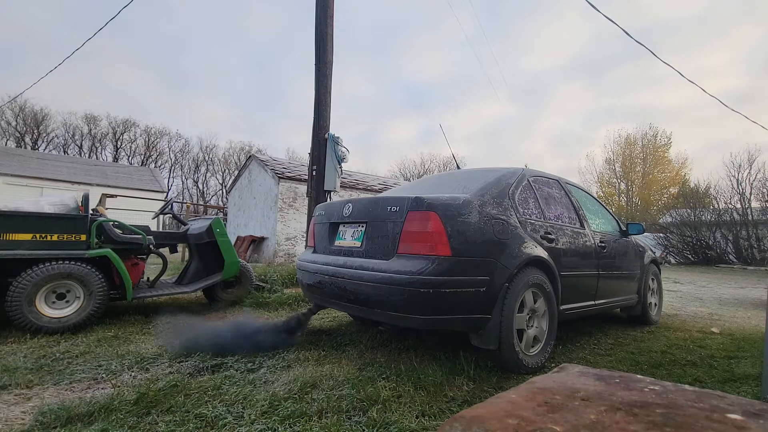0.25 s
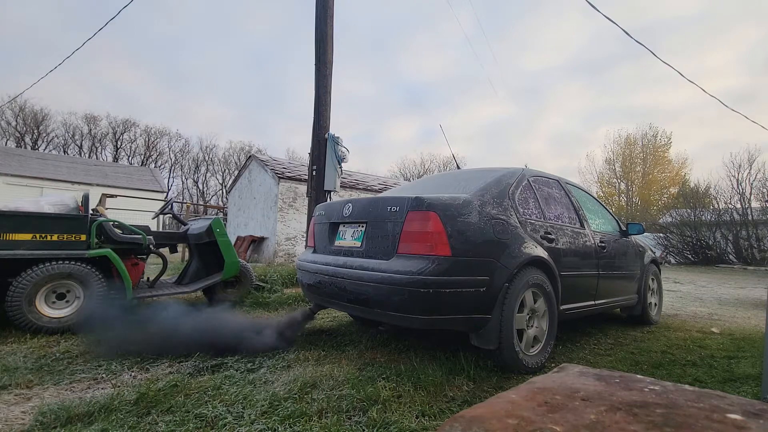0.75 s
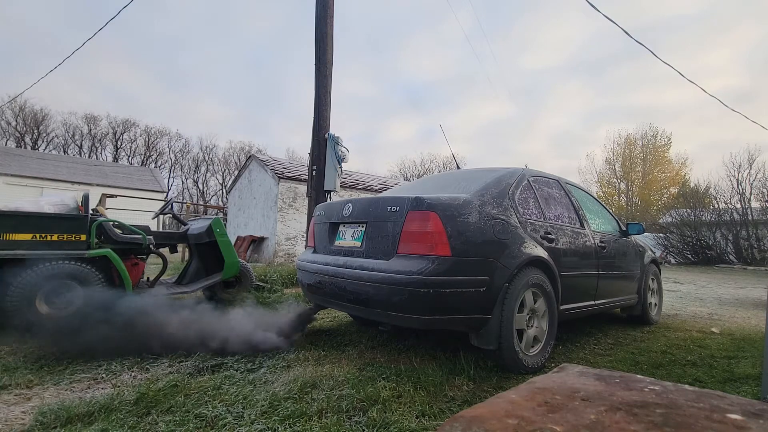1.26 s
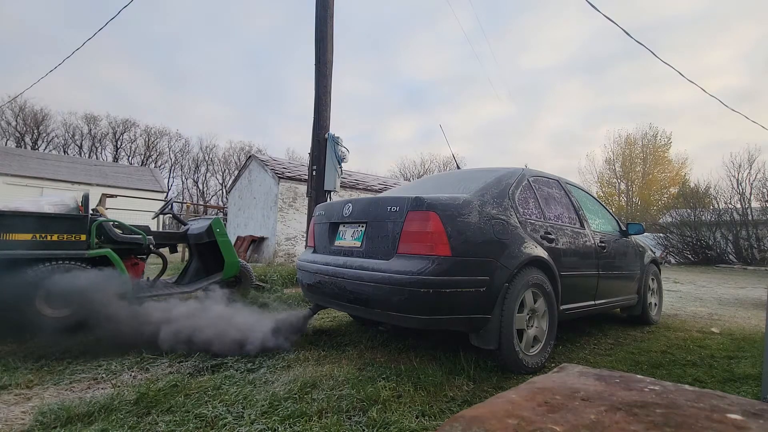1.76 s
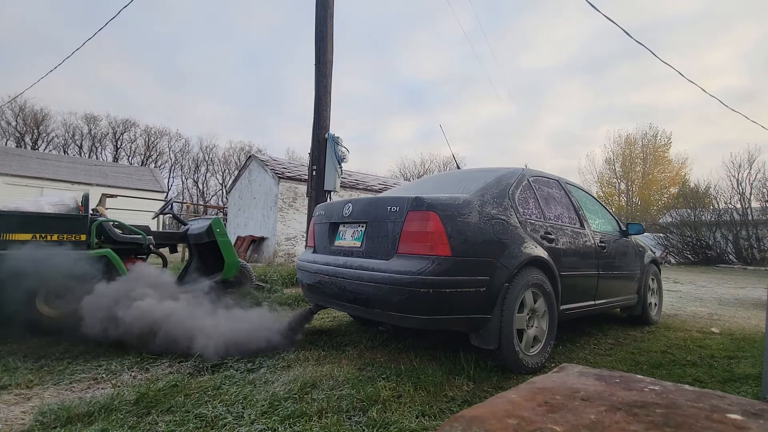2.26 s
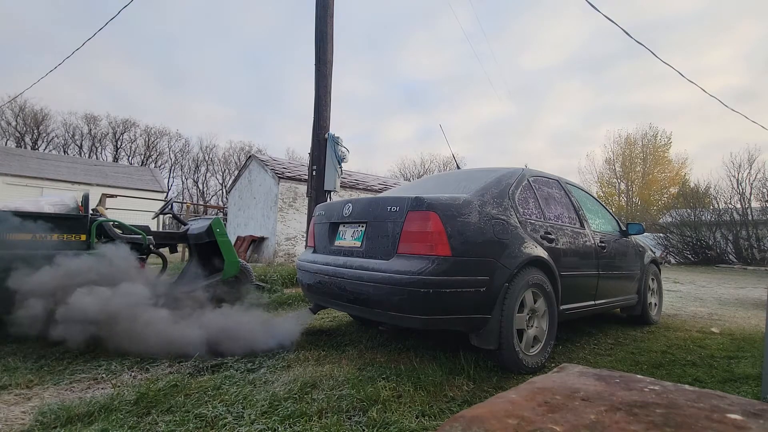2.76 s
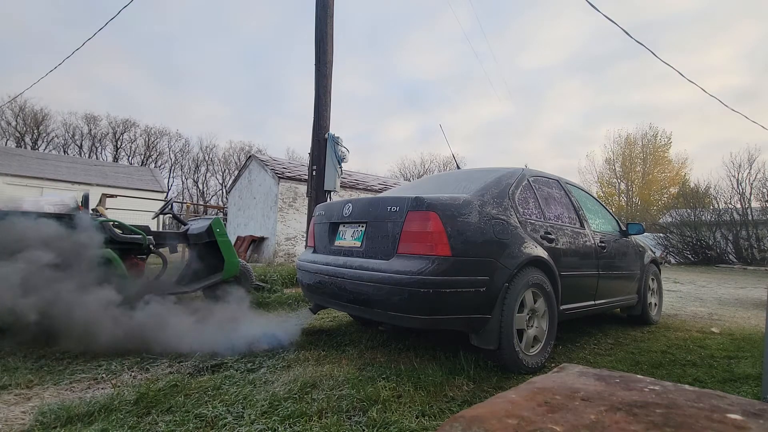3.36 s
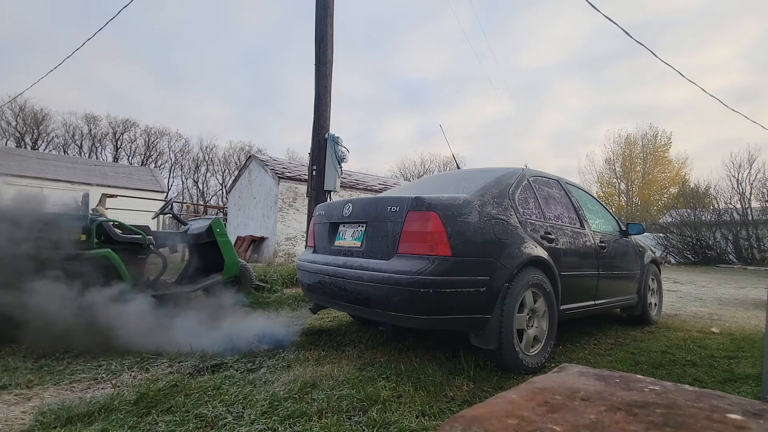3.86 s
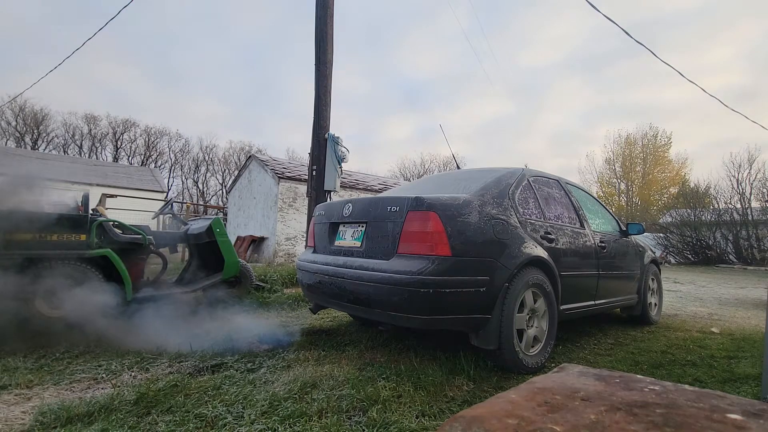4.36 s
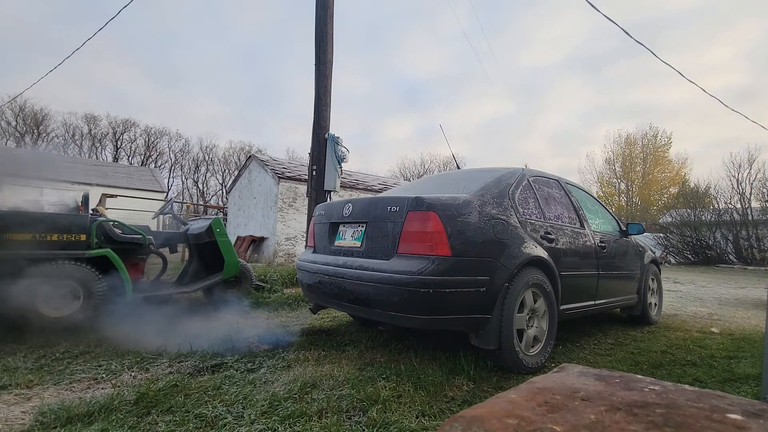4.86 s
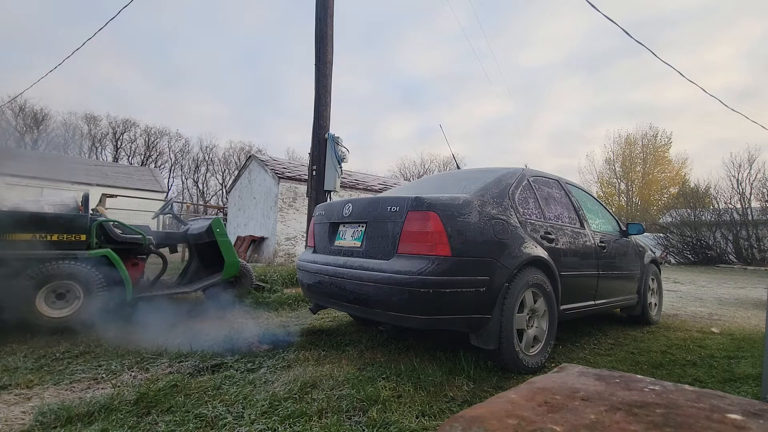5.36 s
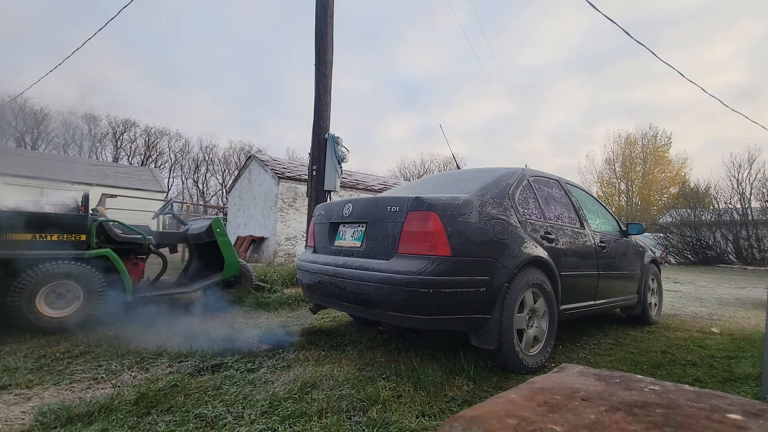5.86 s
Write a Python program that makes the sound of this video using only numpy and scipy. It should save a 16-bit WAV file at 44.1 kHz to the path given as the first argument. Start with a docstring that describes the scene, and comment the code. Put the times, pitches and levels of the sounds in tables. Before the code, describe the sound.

Heard outdoors from close behind the car, a cold diesel engine starts after a brief starter rasp. Ragged clusters of hard knocks, gear rattle and hollow tailpipe honks lurch along with gaps between. The bursts crowd together, a faint whistle rises with a short flare of speed, then everything drops to a lumpy idle with low exhaust boom, metallic knocking and soft belt whirr.

```python
"""A cold four-cylinder diesel car stumbles in ragged bursts of firings, flares up and settles to idle outdoors.
A short starter rasp opens it. Heard from behind, each firing knocks the block and puffs into the exhaust,
noise and clicks that ring resonances. A deep pipe resonance booms, at idle at twice the firing rate.
The tailpipe honks, made of wavering tones, and gears clatter in noise bursts while the crank jerks.
A whistle, a narrow band of noise, rises and falls with the flare; belts and pump whirr softly beneath."""
import sys
import numpy as np
from scipy import signal
from scipy.fft import rfft, irfft, next_fast_len
from scipy.io import wavfile
from scipy.ndimage import uniform_filter1d

SR = 44100
rng = np.random.default_rng(int(sys.argv[2]) if len(sys.argv) > 2 else 0)


def dump_mix(stems):
    """Bounce the given channels to the path in sys.argv[1] as a 16-bit WAV at rate SR."""
    frames = np.atleast_2d(stems).T  # one column per channel
    limited = np.clip(frames, -1, 1)  # hard clip at full scale
    pcm = np.round(limited * 32767).astype(np.int16)
    wavfile.write(sys.argv[1], SR, pcm)


N = 269892
T = np.arange(N) / SR

# In every table, balance_db is left minus right and lead_rad is how far the left side leads.
# speed of the running engine: time_s, firings_per_s
RUNNING_SPEED = [(1.932, 47.66), (2.135, 41.01), (2.25, 37.17), (2.36, 34.61), (2.55, 33.78), (2.7, 37.12),
                 (2.8, 32.97), (2.92, 34.41), (3.3, 34.03), (4.1, 33.82), (4.8, 33.88), (4.95, 32.86),
                 (5.15, 33.97), (5.7, 33.74), (5.9, 32.94), (6.12, 36.69)]
# how hard the running engine works: time_s, knock_db, puff_db (before each firing's own differences)
ENGINE_LOAD = [(2.13, -28.5, -27), (2.4, -30, -32), (2.65, -26, -24), (3.0, -27.5, -27), (3.7, -30, -32),
               (5.0, -30, -31), (6.12, -32, -33.5)]
# hardening of the exhaust pulses as the engine pulls itself up to speed: time_s, extra_db
PULSE_HARDNESS = [(1.1, -3.5), (1.9, -3.5), (2.25, 7), (2.6, 0), (3.4, -0.5)]
# the ragged firings of the start: time_s, knock_db, rattle_db, honk_db
STUMBLING_FIRINGS = [(0.004, -25, -35, -18), (0.035, -27, -35.5, -31), (0.081, -19, -43, -25),
                     (0.204, -29, -36.5, -19), (0.231, -34, -26, -8.5), (0.26, -22.5, -65, -29),
                     (0.287, -28, -31.5, -13.5), (0.311, -25, -55, -44), (0.407, -29.5, -56, -34),
                     (0.444, -32, -32.5, -20.5), (0.478, -25, -28, -10), (0.541, -25.5, -33.5, -14.5),
                     (0.566, -22, -53, -41), (0.641, -35.5, -35.5, -24.5), (0.675, -24.5, -33.5, -13.5),
                     (0.707, -21, -31.5, -14.5), (0.734, -19.5, -30.5, -10.5), (0.759, -19.5, -47, -28),
                     (0.892, -42.5, -36, -25), (0.931, -28, -32, -12.5), (0.964, -22.5, -30, -19),
                     (0.993, -19.5, -31.5, -10.5), (1.021, -23.5, -50.5, -30), (1.204, -29.5, -33.5, -24),
                     (1.239, -23, -29.5, -25), (1.268, -18.5, -42, -14), (1.293, -20.5, -38, -35),
                     (1.318, -16, -38.5, -45), (1.412, -35.5, -30.5, -25), (1.447, -27.5, -30, -29),
                     (1.474, -21.5, -33, -18), (1.501, -16, -41, -17), (1.527, -21, -48.5, -28),
                     (1.617, -34, -37.5, -21), (1.645, -27.5, -28.5, -30), (1.672, -20, -33.5, -26),
                     (1.696, -17, -48, -31), (1.721, -22, -38, -28), (1.767, -16, -38, -40),
                     (1.817, -38, -32, -16), (1.847, -25.5, -44.5, -38), (1.87, -18.5, -41, -28),
                     (1.89, -21.5, -34, -25.5), (1.913, -17.5, -50, -31), (1.954, -22, -37.5, -40),
                     (1.975, -22, -37.5, -36.5), (2.019, -20.5, -52, -41), (2.041, -21.5, -40.5, -47),
                     (2.087, -19.5, -40, -48)]
# the crank kicks back against compression between surges: time_s, rattle_db, boom_db
CRANK_KICKBACKS = [(0.143, -31.5, -11.5), (0.376, -32.5, -12), (1.163, -33.5, -15)]
# cylinders in firing order: extra_knock_db, extra_puff_db, ring_hz, relative_ring_db, balance_db
CYLINDER_TRAITS = [(3.3, -1, 1000, 14, -9.5), (4.5, -0.5, 3100, 9.5, -1), (1.5, 2, 1700, 12, -7.5),
                   (3, -1.5, 2550, 7.5, -11.5)]

RUNS_FROM_S = 2.105  # the regular firings are heard from here on


def from_db(db):
    """Turn decibels into gain."""
    return 10 ** (np.asarray(db) / 20)


def at_time(rows, s):
    """Read each column of a curve at the times s."""
    times, *columns = np.transpose(rows)
    return [np.interp(s, times, column) for column in columns]


def at_hz(points, hz):
    """Read a spectrum on a log-frequency axis."""
    knots, values = np.transpose(points)
    return np.interp(np.log(hz + 1), np.log(knots), values)


def pan(db):
    """Left and right gains for a level difference."""
    return from_db(db * np.array([[.5], [-.5]]))


def filtered(x, hz, kind="low"):
    """Second-order filter that keeps what lies below, above or between the given pitches."""
    return signal.sosfilt(signal.butter(2, hz, kind, fs=SR, output="sos"), x)


def resonate(x, hz, width_hz):
    """A ringing resonance that keeps the power of white noise; a narrower one rings longer."""
    r = np.exp(-np.pi * width_hz / SR)
    feedback = [1, -2 * r * np.cos(2 * np.pi * hz / SR), r * r]
    return signal.lfilter([1, 0, -1], feedback, x + 1e-18) * np.sqrt((1 - r * r) / 2)


def mode(drive, hz, width_hz, db, balance_db, lead_rad):
    """One resonance, reaching left and right with different levels and phase."""
    wave = resonate(drive, hz, width_hz)
    wave = filtered(wave, min(1.34 * hz, 5600))
    late = np.interp(T - lead_rad / (2 * np.pi * hz), T, wave)
    return from_db(db) * pan(balance_db) * np.array([wave, late])


def pair(mid, side, hz):
    """Mix two unrelated signals into left and right, as alike as the air makes them at each pitch."""
    # pitch_hz, likeness (1 the same, -1 opposite)
    stereo_likeness = [(100, 1), (270, 1), (450, 0.81), (1220, -0.82), (2000, -0.23), (3300, -0.66),
                       (5500, 0.77), (10000, 0.52)]
    alike = np.clip(at_hz(stereo_likeness, hz), -.98, .98)
    mid = mid * np.sqrt((1 + alike) / 2)
    side = side * np.sqrt((1 - alike) / 2)
    return np.array([mid + side, mid - side])


def hiss(envelope, colour):
    """Stereo noise shaped in time by an envelope, then in pitch by a filter that never sounds early."""
    # loudness of left against right: pitch_hz, balance_db
    noise_balance = [(60, 6.5), (160, 8.5), (450, -11.5), (1220, -7), (2500, -1.5), (3300, -1.5),
                     (5000, 12), (8000, 11.5), (13000, 0.5)]
    size = 2 * next_fast_len(N // 2 + 4096)
    hz = np.fft.rfftfreq(size, 1 / SR)
    gain = from_db(at_hz(colour, hz))
    # folding the cepstrum (spectrum of the log gain) gives the filter its earliest response
    cepstrum = irfft(np.log(gain / np.sqrt(np.mean(gain ** 2))))
    cepstrum[1:size // 2] *= 2
    cepstrum[size // 2 + 1:] = 0
    noise = rng.standard_normal((2, N)) * envelope
    mid, side = rfft(noise, size) * np.exp(rfft(cepstrum))
    return irfft(pair(mid, side, hz) * pan(at_hz(noise_balance, hz)))[:, :N]


def clicks(times, sizes):
    """One sample of the given size at each time."""
    return np.bincount(np.clip(times * SR, 0, N - 1).astype(int), sizes, N)


def die_away(x, s):
    """Let each input fade exponentially over s seconds."""
    return signal.lfilter([1], [1, -np.exp(-1 / (s * SR))], x + 1e-18)


def bursts(times, level_db, hold_s, decay_s, tail_db, tail_s):
    """Envelope of blows: a short swell, a fast decay, then the weak scatter from yard and sheds."""
    energy = clicks(times, from_db(level_db) ** 2)
    power = die_away(energy, decay_s) + from_db(tail_db) ** 2 * die_away(energy, tail_s)
    return np.sqrt(die_away(power, hold_s) / (hold_s * SR))


def swells(times, level_db, half_s):
    """Summed power of bell-shaped swells."""
    return sum(from_db(db) ** 2 / (1 + ((T - s) / half_s) ** 2 / 2) ** 4
               for s, db in zip(times, level_db))


def grit(rough_db=2.5, size=24):
    """Half-millisecond grains of uneven strength, as of many tiny contacts; mean power 1."""
    grains_db = rough_db * rng.standard_normal(N // size + 1).clip(-2, 2)
    gain = np.repeat(from_db(grains_db), size)[:N]
    return gain / np.sqrt(np.mean(gain ** 2))


def breathy(hz, width_hz):
    """A narrow band of noise that follows a pitch."""
    waver = filtered(rng.standard_normal((2, N)), width_hz)
    slow_noise = (waver[0] + 1j * waver[1]) / waver.std()
    carrier = np.exp(2j * np.pi * np.cumsum(hz) / SR)
    return (slow_noise * carrier).real


def running_firings(scatter_db=2.2, jitter_s=0.0002, puff_share=0.35, lump_db=1.36):
    """Time firings by crank speed, set strength by load and cylinder: times, knock dB, puff dB, cylinder."""
    # a cylinder lights all at once with a bang, or barely lights: time_s, extra_knock_db
    odd_firings = [(2.435, -6.5), (2.462, 7.5), (2.492, 9), (2.52, 5), (2.55, -22), (2.611, 7.5),
                   (2.693, 4), (2.78, -26), (2.806, -2.5), (2.896, 5.5), (3.041, 4.5), (3.1, 5.5),
                   (3.16, 1.5), (2.984, 3), (3.25, -20.5), (3.335, 4.5), (3.453, 6.5), (3.48, -16.5),
                   (3.51, 7), (3.54, 4.5), (3.804, 6.5), (4.072, -6), (4.31, -14), (4.336, 8), (4.427, 7.5),
                   (4.543, 5), (4.633, 5.5), (4.9, -7.5), (4.991, 9.5), (5.138, 6.5), (5.97, 7.5)]
    speed = at_time(RUNNING_SPEED, T)[0] * (T > RUNNING_SPEED[0][0])
    count = np.cumsum(speed) / SR
    times = np.interp(np.arange(int(count[-1]) + 1), count, T)
    cylinder = np.arange(len(times)) % len(CYLINDER_TRAITS)
    late, harder, fuller = rng.standard_normal((len(times), 3)).T
    own_db, own_puff_db = np.array(CYLINDER_TRAITS)[cylinder, :2].T
    extra_db = own_db + scatter_db * harder
    for s, db in odd_firings:
        extra_db[np.argmin(abs(times - s))] = db
    knock_db, puff_db = at_time(ENGINE_LOAD, times)
    # a harder knock also puffs harder
    puff_db = puff_db + own_puff_db + puff_share * extra_db + lump_db * fuller
    rows = np.array([times + jitter_s * late, knock_db + extra_db, puff_db, cylinder])
    return rows[:, times > RUNS_FROM_S]


def firings(running):
    """Join stumbling and running firings: times, knock dB and puff dB."""
    times, knock_db = np.transpose(STUMBLING_FIRINGS)[:2]
    # a firing with a -19 dB knock puffs at -19 dB; the puff follows 0.46 of the knock's swing
    puff_db = -19 + 0.46 * (knock_db + 19.0)
    return np.hstack([[times, knock_db, puff_db], running[:3]])


def honks(delay_s=0.0064, kick_honk_db=-22.5):
    """The heavily fuelled firings honk after a delay, kickbacks at one fixed level: times and dB."""
    times, _, _, level_db = np.transpose(STUMBLING_FIRINGS)
    kick_s = np.array(CRANK_KICKBACKS)[:, 0]
    return np.r_[times, kick_s] + delay_s, np.r_[level_db, np.full(len(kick_s), kick_honk_db)]


def jerks():
    """The crank jerks at each stumbling firing and at kickbacks: times and dB."""
    return np.vstack([np.array(STUMBLING_FIRINGS)[:, ::2], np.array(CRANK_KICKBACKS)[:, :2]]).T


def puffs(times, puff_db, kick_lag_s=.022, kick_puff_db=-25.5):
    """Add the unburnt air that kickbacks push out of the tailpipe to the firings' puffs: times and dB."""
    kick_s = np.array(CRANK_KICKBACKS)[:, 0] + kick_lag_s
    return np.r_[times, kick_s], np.r_[puff_db, np.full(len(kick_s), kick_puff_db)]


def whirr():
    """Belts and pump whirr as steady noise that grows a little as the engine starts."""
    # pitch_hz, relative_level_db
    whirr_colour = [(25, 2.5), (60, -16), (130, 9.5), (450, 0), (750, -7.5), (2600, -12.5), (3300, -12.5),
                    (4900, -23.5), (6500, -39.5), (8000, -50), (10000, -64), (15000, -50.5)]
    level_db = np.interp(T, [1.5, 2.0], [-40.5, -36.5])
    return hiss(from_db(level_db), whirr_colour)


def hoots(waver_hz=22):
    """Faint, breathy hoots swell out of the idle as narrow bands of noise."""
    # time_s, half_length_s, pitch_hz, level_db
    hoot_rows = [(4.196, 0.045, 825, -42), (5.992, 0.057, 679, -40.5)]
    return pan(-10.0) * sum(np.sqrt(swells([s], [db], half_s)) * breathy(np.full(N, hz), waver_hz)
                            for s, half_s, hz, db in hoot_rows)


def ping(time_s=1.413, balance_db=10.0, lead_rad=1.0):
    """One jolt sets a small steel part ringing."""
    # pitch_hz, width_hz, relative_level_db
    steel_part = (6465, 50, -17)
    return mode(clicks(np.array([time_s]), [1.]), *steel_part, balance_db, lead_rad)


def whistle(times, knock_db, width_hz=80, whistle_db=-4.5, follow=0.69, chop_s=0.0049):
    """A breathy air whistle that glides with the flare and is chopped by the firings."""
    # time_s, pitch_hz, relative_level_db
    whistle_curve = [(1.8, 720, -24.5), (1.875, 850, -16), (1.955, 1010, -14), (2.03, 1130, -16.5),
                     (2.09, 1204, -19), (2.17, 1026, -20), (2.27, 816, -20.5), (2.34, 790, -51)]
    hz, level_db = at_time(whistle_curve, T)
    throb = bursts(times, follow * (knock_db + 19.5), 0.00063, chop_s, -20.5, 0.044)
    return pan(-8.5) * from_db(level_db + whistle_db) * throb * breathy(hz, width_hz)


def gears(clatter_db=4.0, rasp_db=-22.5, release_s=0.083):
    """The starter rasps until it lets go; the jerking crank then rattles the gears, tooth against tooth."""
    # starter noise: pitch_hz, relative_level_db
    rasp_colour = [(400, 6.5), (1500, -6), (2600, 1), (3800, -11), (5200, -12.5), (6200, -18), (8000, -28),
                   (10000, -37.5), (12700, -31.5), (15500, -31)]
    # gear noise: pitch_hz, relative_level_db
    clatter_colour = [(300, -14), (800, 7.5), (2200, -1), (3200, 4), (4000, -9), (5000, -19), (6500, -27),
                      (8000, -30.5), (10000, -50), (12700, -34), (15500, -39.5)]
    rasp = from_db(rasp_db) * np.exp(-np.maximum(T - release_s, 0) / 0.023)
    rattle = bursts(*jerks(), 0.002, 0.017, -14.5, 0.012)
    teeth = grit(rough_db=3.6)
    return hiss(rasp * teeth, rasp_colour) + from_db(clatter_db) * hiss(rattle * teeth, clatter_colour)


def cylinder_rings(running, width_hz=55, lead_rad=2.7, scatter_db=4.0):
    """Each cylinder strikes its own part of the block, which rings with a note of its own."""
    times, knock_db, _, cylinder = running
    knock_db = knock_db + scatter_db * rng.standard_normal(len(times))
    out = 0
    for k, (_, _, hz, db, balance_db) in enumerate(CYLINDER_TRAITS):
        strikes = clicks(times, from_db(knock_db) * (cylinder == k))
        out = out + mode(strikes, hz, width_hz, db, balance_db, lead_rad)
    return out


def knock(times, level_db, broad_db=-9.0, modes_db=-4.5, rumble_db=-39.5, second_crack_s=.0045, second_crack_db=-2.0):
    """Combustion cracks against the block in two quick blows, the second just after the first, and rings it in
    a varying mix."""
    # noise of the crack: pitch_hz, relative_level_db
    crack_colour = [(250, -7.5), (500, -16), (800, 4.5), (1800, 2.5), (2650, 5), (3200, -16), (4900, -20.5),
                    (6000, -27), (8000, -39), (10000, -64), (12700, -50), (15500, -71.5)]
    # resonances of the block: pitch_hz, width_hz, relative_level_db, balance_db, lead_rad
    block_modes = [(564.4, 26, -1.5, 0, 2), (850.5, 27, -4, -1, 1.83), (1027.5, 34, -10, -8.5, 2.5),
                   (1130, 390, -10.5, -6, 1.5), (1401, 62, -2, -3.5, 3.5), (1730, 40, -6.5, 0.5, 1.65),
                   (2103, 99, -7.5, -3, 3.5), (2427, 53, -14, -18, -4.5), (2608, 40, -8, 0, 4),
                   (4044, 240, -20.5, 10.5, -1.65), (4600, 220, -20, 6.5, -1.5)]
    times = np.r_[times, times + second_crack_s * rng.uniform(.5, 1.5, len(times))]
    level_db = np.r_[level_db, level_db + second_crack_db]
    crack = bursts(times, level_db, .0008, .004, -19, .022)
    out = from_db(broad_db) * hiss(crack * grit(), crack_colour)
    # valve gear and pump keep the block faintly ringing between knocks
    rumble = from_db(rumble_db) * np.clip(T / RUNS_FROM_S, 0, 1) ** 2
    for row in block_modes:
        mix_db = rng.normal(0, 2.0, len(times))
        strength = bursts(times, level_db + mix_db, .0007, .0029, -20, .022)
        drive = rng.standard_normal(N) * np.hypot(strength, rumble)
        out += from_db(modes_db) * mode(drive, *row)
    return out


def drone(lead_s=.002):
    """Once the engine runs, the even train of exhaust pulses sounds its low harmonics as sine tones."""
    # multiple_of_firing_rate, relative_level_db, balance_db
    harmonics = [(4, -8.5, -2), (8, -17.5, 2)]
    rate = at_time(RUNNING_SPEED, T)[0]
    firing_count = np.cumsum(rate * (T > RUNNING_SPEED[0][0])) / SR + lead_s * rate
    level_db = at_time(ENGINE_LOAD, T)[1] + .5 * at_time(PULSE_HARDNESS, T)[0]
    running = np.clip((T - 2.02) / .1, 0, 1)
    lines = sum(from_db(db) * pan(balance_db) * np.sin(2 * np.pi * round(order) * firing_count)
                for order, db, balance_db in harmonics)
    return running * from_db(level_db) * lines


def bark(bark_db=-1.5, waver_hz=40, slide_share=.04, slide_s=.012):
    """Honks swell and die on tailpipe resonances, wavering and sliding up in pitch as hot gas fills the pipe."""
    # tailpipe tones: pitch_hz, width_hz, relative_level_db, balance_db, lead_rad
    tailpipe_tones = [(276, 10, -17, 4, 0.5), (354, 10, -13, -9.5, 1.5), (556, 12, -1, -10, -2.5),
                      (612, 12, -5, -16, 0.98), (707, 44, -11, 1, -3.5)]
    times, level_db = honks()
    gush = bursts(times, level_db, .007, .009, -30, .04)
    age_s = T - np.maximum.accumulate(T * (clicks(times, from_db(level_db)) > 0))
    # from about 3 % below pitch, through it after slide_s, towards 4 % above
    slide = 1 + slide_share * np.tanh(age_s / slide_s - 1)
    out = 0
    for hz, width_hz, db, balance_db, lead_rad in tailpipe_tones:
        waver = filtered(rng.standard_normal(N), waver_hz)
        pitch_hz = hz * slide + width_hz * waver / waver.std()
        phase = 2 * np.pi * np.cumsum(pitch_hz) / SR
        out = out + from_db(db) * pan(balance_db) * np.sin([phase, phase - lead_rad])
    return from_db(bark_db) * gush * out


def boom_level(peak_share=0.63, swell_s=0.038, second_swell_s=0.034, kick_lag_s=0.051, kick_swell_s=0.012):
    """The boom swells in each surge, as the crank coasts and after kickbacks, over a curve for running."""
    # surges: start_s, length_s, boom_db, second_boom_db, second_lag_s (after the surge's end)
    surges = [(-0.028, 0.065, -11, -10.5, 0.062), (0.197, 0.11, -14.5, -13, 0.013),
              (0.447, 0.11, -10, -13.5, 0.018), (0.648, 0.12, -8.5, -14, 0.068),
              (0.906, 0.12, -8, -16, 0.057), (1.202, 0.11, -8.5, -12.5, 0.065),
              (1.41, 0.12, -9.5, -15, 0.067), (1.62, 0.096, -11.5, -9, 0.062),
              (1.816, 0.078, -11.5, -28, 0.024)]
    # boom once the engine runs: time_s, level_db
    boom_curve = [(1.9, -27.5), (1.98, -8), (2.08, -19), (2.23, -24), (2.37, -12.5), (2.63, -9.5),
                  (2.78, -21.5), (2.87, -11), (3.7, -12.5), (4.2, -13), (4.95, -15.5), (5.2, -14),
                  (6.12, -16)]
    start, length, first_db, second_db, lag = np.transpose(surges)
    kick_s, _, kick_db = np.transpose(CRANK_KICKBACKS)
    power = (swells(start + peak_share * length, first_db, swell_s)
             + swells(start + length + lag, second_db, second_swell_s)
             + swells(kick_s + kick_lag_s, kick_db, kick_swell_s))
    return np.sqrt(power + from_db(at_time(boom_curve, T)[0]) ** 2)


def boom(times, level_db, hz=64.77, width_hz=11, delay_s=0.0042, dark_hz=82):
    """The lowest pipe resonance, pumped by the firings; at idle it locks to twice their rate."""
    wave = resonate(clicks(times + delay_s, from_db(level_db / 2)), hz, width_hz)
    wave = filtered(wave, [44, dark_hz], "band")
    # level out the wave's own loudness, then give it the boom's
    power = uniform_filter1d(abs(signal.hilbert(wave)) ** 2 / 2, size=700)
    return pan(-2.2) * boom_level() * wave / np.sqrt(abs(power) + 1e-12)


def exhaust(times, level_db, pulse_db=21.5, gas_db=-3.0, broad_db=-4.0, soft_hz=520, echo_db=-6.0,
            echo_s=.0122):
    """Pressure pulses and gushing gas ring the pipe; all but the bass echoes once along it."""
    # noise of the puff: pitch_hz, relative_level_db
    puff_colour = [(80, -27.5), (180, 16), (450, 20), (700, -10), (1200, -4.5), (2500, -54), (8000, -61.5)]
    # resonances of the pipe: pitch_hz, width_hz, relative_level_db, balance_db, lead_rad
    pipe_modes = [(124.2, 5.9, 6.5, 1, 8), (174.1, 7.2, -2, 3.5, 1.5), (249.5, 23, -8.5, 5, -0.4),
                  (277.8, 15, -6, 2, -0.8), (350.6, 30, -5, -8, -1.66), (408.5, 23, -3.5, -3.5, 2),
                  (398, 61, -5.5, 2.5, 2), (564, 79, -4.5, 1.5, 3)]
    gush = bursts(times, level_db, .002, .008, -18, .05)
    pulse = from_db(pulse_db) * clicks(times, from_db(level_db + at_time(PULSE_HARDNESS, times)[0]))
    pulse = filtered(pulse, soft_hz)
    out = from_db(broad_db) * hiss(gush * grit(), puff_colour)
    for row in pipe_modes:
        # the gas drives higher resonances harder
        gas = from_db(gas_db) * row[0] / 450 * gush * rng.standard_normal(N)
        out += mode(pulse + gas, *row)
    echo = filtered(out, 200, "high")
    return out + from_db(echo_db) * np.array([np.interp(T - echo_s, T, side) for side in echo])


def scene():
    """Stumbling start and steady running feed the same block and pipe, over the whirr of belts and pump."""
    running = running_firings()
    times, knock_db, puff_db = firings(running)
    engine = hoots() + ping() + whistle(times, knock_db) + gears()
    engine = engine + cylinder_rings(running) + knock(times, knock_db)
    tailpipe = drone() + bark() + boom(times, puff_db) + exhaust(*puffs(times, puff_db))
    return whirr() + engine + tailpipe


def record(dry):
    """Round off the highest peaks and cut the treble, by 70 dB from 15.7 kHz up."""
    rounded = dry / (1 + dry ** 8) ** (1 / 8)
    return signal.sosfilt(signal.cheby2(12, 70, 15700, fs=SR, output="sos"), rounded)


dry = scene()
out = record(dry)
dump_mix(out)
```